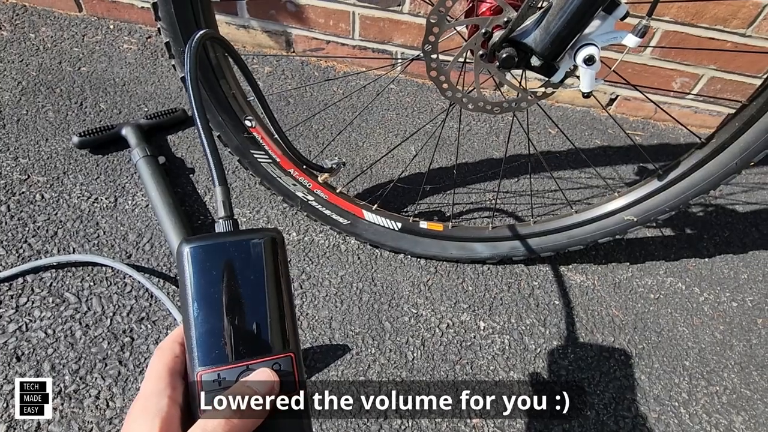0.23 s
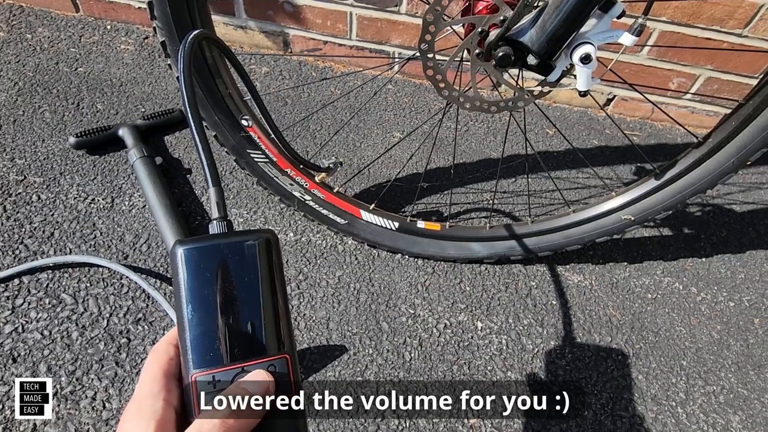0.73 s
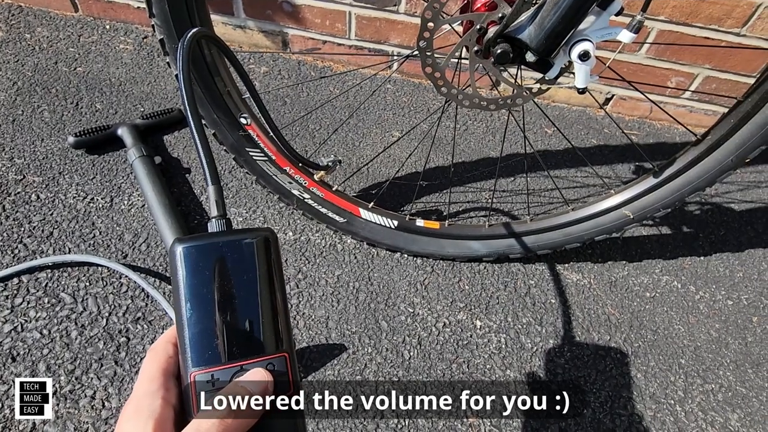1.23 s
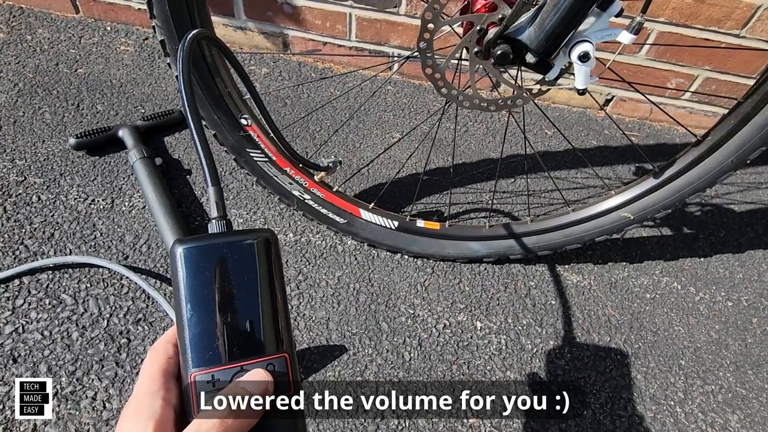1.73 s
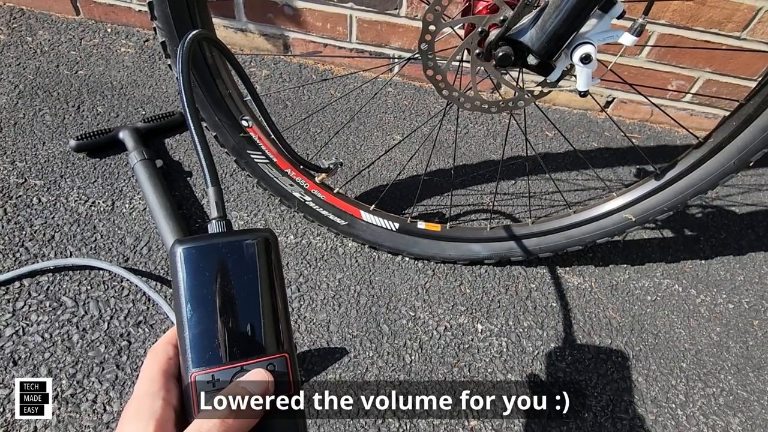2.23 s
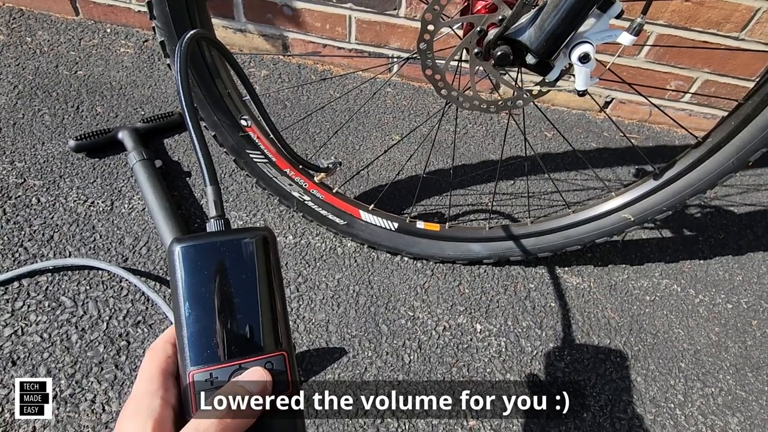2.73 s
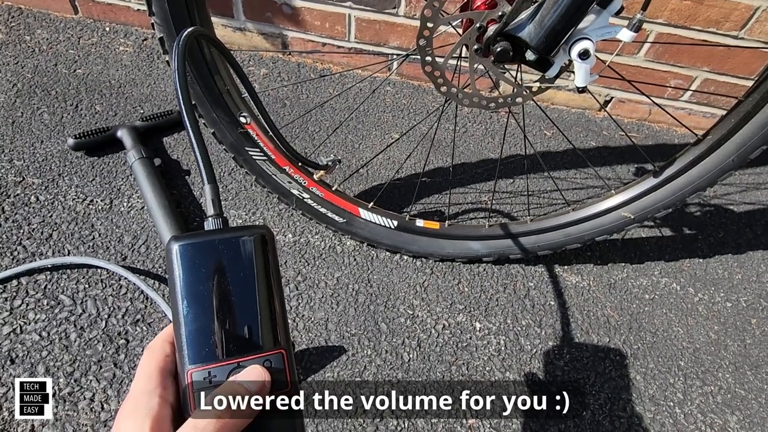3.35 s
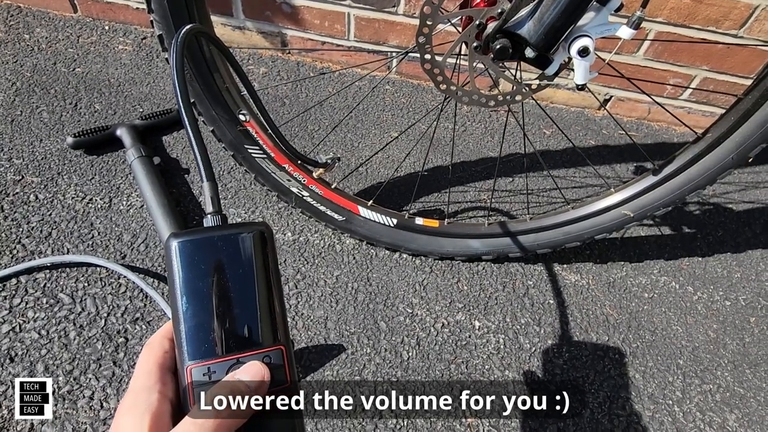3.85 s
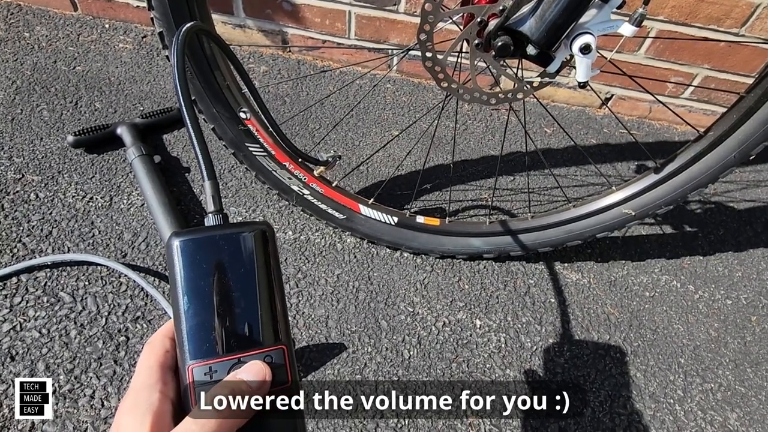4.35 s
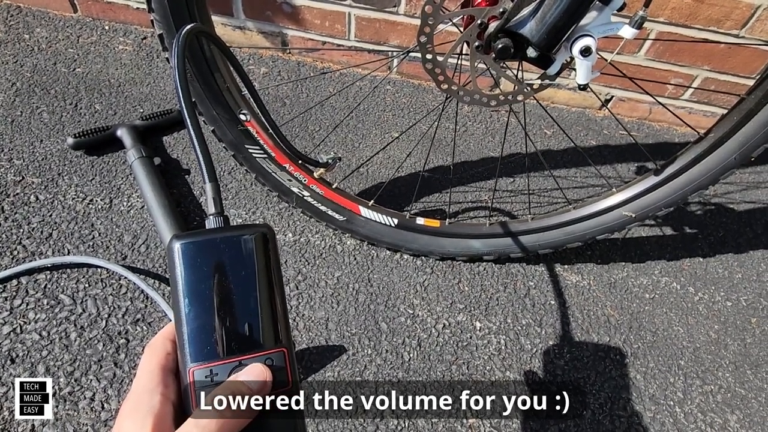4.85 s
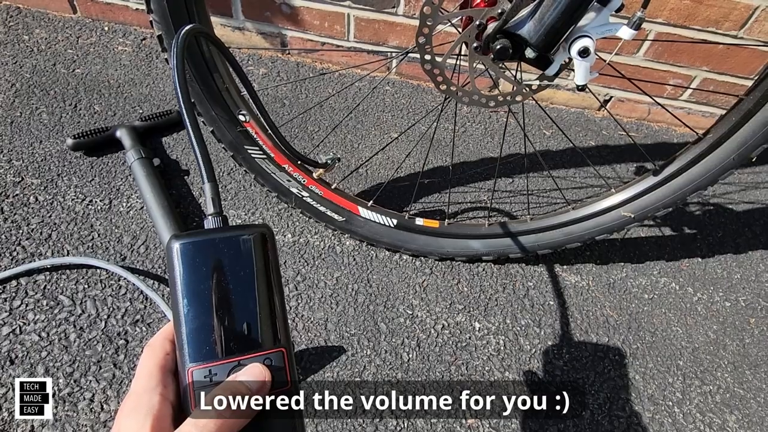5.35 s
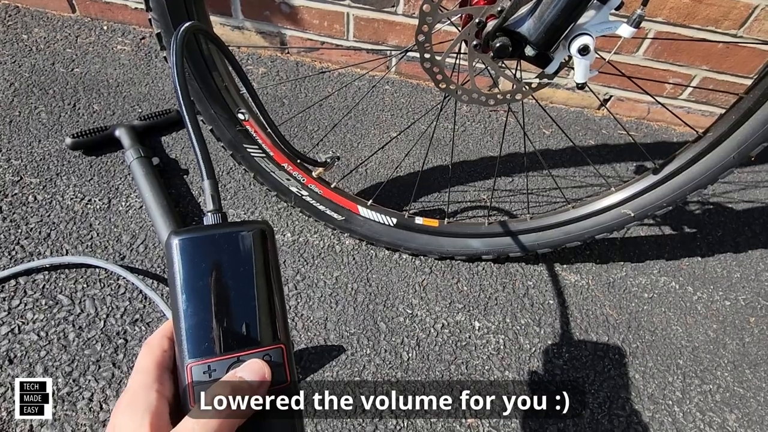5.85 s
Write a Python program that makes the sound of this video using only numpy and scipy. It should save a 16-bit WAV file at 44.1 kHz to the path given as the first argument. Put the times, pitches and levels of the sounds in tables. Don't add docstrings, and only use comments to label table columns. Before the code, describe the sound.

A small handheld air pump drones close by with fast throbbing, whining gears and rattling casing, slowing slightly while light wind buffets the microphone.

```python
import sys
import numpy as np
from scipy import signal
from scipy.fft import rfft, irfft, next_fast_len
from scipy.io import wavfile
from scipy.ndimage import uniform_filter1d, map_coordinates

SR = 44100
rng = np.random.default_rng(int(sys.argv[2]) if len(sys.argv) > 2 else 0)


def generate_wav(signal):
    frames = np.transpose(np.atleast_2d(signal))
    scaled = np.clip(frames, -1, 1) * 32767
    pcm = np.round(scaled).astype(np.int16)
    wavfile.write(sys.argv[1], SR, pcm)


def boost(x):
    u = np.asarray(x, float) / 20
    return 10 ** u


N = 268569


def unit(x):
    return x / np.sqrt(np.mean(x ** 2) + 1e-20)


def along(points, hz):
    f, *columns = np.transpose(points)
    return np.array([np.interp(np.log(hz + 1), np.log(f + 1), column) for column in columns])


def curves(rows):
    times, *columns = np.transpose(rows)
    return [np.interp(np.arange(N) / SR, times, column) for column in columns]


def wobble(rate):
    knots = rng.standard_normal(int(N * rate / SR) + 4)
    return map_coordinates(knots, [np.arange(N) * rate / SR])


def filtered(x, response):
    size = next_fast_len(N + 8192)
    hz = np.fft.rfftfreq(size, 1 / SR)
    return irfft(rfft(x, size) * response(hz), size)[..., :N]


# (time [s], frequency [Hz])
SPEED = [
    (0, 4361),
    (.6, 4349),
    (1.3, 4340),
    (2.2, 4312),
    (2.5, 4314),
    (4.2, 4266),
    (5.7, 4233),
    (6.09, 4229),
]
SPEED_ORDER = 73
FIRST_VALVE = .48


def crank_angle():
    steady = curves(SPEED)[0] / SPEED_ORDER
    hunting = .0009 * np.sin(2 * np.pi * np.cumsum(steady) / SR / 8) + .00035 * wobble(25)
    return np.cumsum(steady * (1 + hunting)) / SR + 1 - FIRST_VALVE


INTAKE_LEAD, INTAKE_ORDER = .28, 3.5
VALVE_ORDER = 24
CASING_ORDER, CASING_WIDTH = 14, .3


def thump_phase(order):
    intake_size = 2.8 * np.exp(-4 * np.log(order / INTAKE_ORDER) ** 2)
    intake = intake_size * np.exp(2j * np.pi * order * INTAKE_LEAD + .3j)
    valve = 1 / (1 - (order / VALVE_ORDER) ** 2 + .9j * order / VALVE_ORDER)
    ring = 1 / (1 + 1j * (order / CASING_ORDER - CASING_ORDER / order) / CASING_WIDTH)
    return np.angle(valve * (1 + 4 * ring ** 2) + intake)


TEETH = 37
MESH_LAG, MESH_GLIDE = .33, .26


def lines(turns, table, scatter, unsteady_db, lag=0):
    out = np.zeros((2, N), np.float32)
    run = np.arange(0, N + 64, 64) / N - .5
    for order, left_db, right_db, change_db, left_lead in table:
        knots = rng.standard_normal(60)
        unsteady = unsteady_db * map_coordinates(knots, [(run + .5) * 50])
        drift = unit(boost(change_db * run + unsteady))
        gain = np.outer(boost([left_db, right_db]), np.repeat(drift, 64)[:N])
        port_lead = np.c_[[0, left_lead]]
        side = order - TEETH * round(order / TEETH)
        if lag and order > TEETH / 2 and abs(side) < 4:
            start = -2 * np.pi * side * (MESH_LAG + MESH_GLIDE * side / 2) - port_lead
        else:
            crack_delay = 2 * np.pi * lag * (order - 6.5) * (order > 8)
            start = thump_phase(order) + scatter * knots[-1] - port_lead - crack_delay
        angle = order * turns % 1 * 2 * np.pi + start
        out -= np.sqrt(2) * gain * np.cos(angle.astype(np.float32))
    return out


# (multiple of turn rate, left level [dB], right level [dB], change over the run [dB], left lead [rad])
STROKE = [(1, -43, -43, 8, 0), (2, -40, -40, 0, .1), (3, -37, -41, -1, .1), (4, -34, -37, -2, .1),
          (5, -42, -42, 0, .2), (6, -40, -41, 0, .5), (7, -46, -49, -1, .5), (8, -39, -40, -5, .7),
          (9, -56, -52, -8, .8), (10, -45, -45, 5, .9), (11, -46, -42, 1, 1), (12, -56, -50, -10, 2.2)]
FLAP_LEAD = .065


def piston_stroke(turns):
    return lines(turns, STROKE, scatter=.05, unsteady_db=.7, lag=-FLAP_LEAD)


# (multiple of turn rate, left level [dB], right level [dB], change over the run [dB], left lead [rad])
KNOCK = [(13, -45, -41, -10, 2.3), (14, -42, -47, -5, 2.9), (15, -45, -67, 4, 1.6), (16, -44, -46, 2, 1.3),
         (17, -48, -46, 10, 1.3), (18, -63, -48, 7, 1.1), (19, -54, -50, 6, -3), (20, -50, -57, -10, 3),
         (21, -49, -54, -1, -2.8), (22, -49, -52, 10, -2.5), (23, -40, -48, 4, -2.3), (24, -47, -57, 3, .6),
         (25, -48, -55, -10, 2.4), (26, -48, -52, 2, -2.9), (27, -44, -48, 2, -2.1),
         (28, -49, -63, 5, -2.7), (29, -50, -55, 9, -2.9), (30, -50, -51, -3, -1.7)]
CRACK_LAG = .075


def valve_knock(turns):
    return boost(1.1) * lines(turns, KNOCK, scatter=.12, unsteady_db=.9, lag=CRACK_LAG)


# (multiple of turn rate, left level [dB], right level [dB], change over the run [dB], left lead [rad])
GEAR = [(31, -43, -51, -7, 2.2), (32, -41, -54, 0, 3.1), (33, -39, -50, 9, 3), (36, -47, -54, 5, -2.9),
        (37, -40, -45, 5, -2.3), (38, -41, -45, -5, 3), (39, -47, -47, -1, -3.1), (40, -51, -53, -3, 3)]
GEAR_OCTAVE = [(52, -49, -56, 8, .4), (58, -45, -59, -2, .2), (61, -47, -54, 8, 2.4),
               (62, -47, -53, 9, 2.8), (64, -48, -59, 1, -2.6), (65, -47, -56, 6, -2.2),
               (67, -44, -56, 10, .3), (68, -52, -50, -2, 1.5), (69, -51, -53, 4, 1),
               (70, -51, -53, 6, -.4), (71, -49, -46, -2, -2.1), (72, -46, -47, -2, -.4),
               (73, -40, -35, -1, 1.6), (74, -44, -43, -4, 2.4), (75, -45, -40, 2, -3),
               (76, -50, -55, 10, -2.4), (77, -52, -43, 2, -.6), (78, -59, -47, 0, -2.8)]


def gear_whine(turns):
    return lines(turns, [*GEAR, *GEAR_OCTAVE], scatter=.5, unsteady_db=1.1, lag=CRACK_LAG)


# (multiple of turn rate, left level [dB], right level [dB], change over the run [dB], left lead [rad])
GEAR_OVERTONES = [(109, -48, -52, -7, 2.4), (110, -55, -47, -10, .7), (111, -45, -49, 3, -.4),
                  (112, -49, -51, -10, -1), (113, -45, -44, -1, -.1), (116, -47, -54, 10, .7),
                  (125, -46, -52, 1, 2.6), (130, -49, -56, -3, .5), (141, -41, -45, -2, 1.6),
                  (143, -44, -48, 9, .8), (145, -47, -50, 10, -.3), (146, -37, -45, 8, .2),
                  (147, -45, -52, 6, 2.1), (148, -44, -52, 10, .4), (149, -46, -56, 4, 2.3),
                  (150, -46, -54, 8, 1.9), (182, -48, -60, 10, 1.6), (183, -48, -55, 10, 1.9),
                  (185, -51, -61, 8, .2), (186, -52, -59, -4, .4), (187, -51, -53, 0, .9),
                  (188, -53, -60, 6, -3.1), (220, -56, -48, 12, .5)]


def gear_overtones(turns):
    return boost(.5) * lines(turns, GEAR_OVERTONES, scatter=.7, unsteady_db=1.1)


# (multiple of motor rate, left level [dB], right level [dB], change over the run [dB], left lead [rad])
MOTOR = [(1, -55, -60, 0, .3), (3, -47, -52, -5, 3.1), (5, -46, -53, 2, -2.4), (7, -50, -61, 1, 2.5),
         (12, -48, -49, -8, -.4), (13, -55, -59, -4, 2.6), (18, -55, -58, -8, -2.1), (25, -51, -61, 3, -.1),
         (27, -52, -58, 0, 3)]
MOTOR_RATIO = 37 / 8


def motor_hum(turns):
    return boost(0.5) * lines(MOTOR_RATIO * turns, MOTOR, scatter=2.95, unsteady_db=-0.5)


def worn_teeth(turns, lasts, size=512):
    fresh = rng.standard_normal((int(turns.max()) + 4, size))
    pattern = uniform_filter1d(fresh, max(int(lasts), 1), axis=0)
    return unit(map_coordinates(pattern.ravel(), [turns * size + size], order=3))


# (frequency [Hz], level [dB])
REPEATS = [(1700, -30), (2300, -4), (2700, -2), (4500, -4), (5000, 0), (9000, -1), (15000, -1)]


def tooth_noise(turns):
    worn = worn_teeth(turns, lasts=50) + .5 * worn_teeth(MOTOR_RATIO * turns, lasts=90, size=112)
    return rng.standard_normal(N) + filtered(worn, lambda hz: boost(along(REPEATS, hz)[0]))


# (turns after the valve [turns], swell [dB], width [turns])
LOAD = [
    (.03, 4, 0.039),
    (.1, 2.5, 0.014),
    (.27, 8, 0.016),
    (.85, 6.5, 0.052),
]


def piston_load(turns):
    load_db = 0
    for at, db, width in LOAD:
        distance = (turns - at + .5) % 1 - .5
        load_db = load_db + db * np.exp(-.5 * (distance / width) ** 2)
    return load_db


# (time [s], level [dB], left-right, heard about its mean [dB])
RATTLE = [
    (0, -39, -6.5),
    (.4, -37.5, -6),
    (1.3, -38, -5.5),
    (4.4, -38.5, -4.5),
    (6.09, -38.5, -6.5),
]
# (frequency [Hz], left level [dB], right level [dB])
CASING = [(210.0, -8.0, -2.0), (360.0, -11.0, -8.0), (570.0, -11.0, -7.0), (770.0, -5.0, -2.0),
          (900.0, -4.0, -7.0), (1070.0, -9.0, -7.0), (1380.0, -2.0, -8.0), (1550.0, -5.0, -6.0),
          (1890.0, 0.0, -8.0), (2050.0, -8.0, -12.0), (2230.0, -7.0, -8.0), (2600.0, -13.0, -12.0)]
MESH = [(2610.0, -13.0, -13.0), (3160.0, -7.0, -9.0), (3300.0, -1.0, -7.0), (3480.0, -7.0, -7.0),
        (3800.0, -3.0, -9.0), (3980.0, -7.0, -7.0), (4550.0, -9.0, -3.0), (5040.0, -14.0, -14.0),
        (5860.0, -12.0, -14.0), (6380.0, -5.0, -10.0), (6660.0, -8.0, -7.0), (6820.0, -3.0, -8.0),
        (7160.0, -9.0, -9.0), (8000.0, -7.0, -13.0)]
HISS = [(8000.0, -7.0, -12.0), (8280.0, -2.0, -5.0), (8590.0, -1.0, -7.0), (9220.0, -12.0, -23.0),
        (9670.0, -15.0, -25.0), (10200.0, -14.0, -23.0), (10760.0, -6.0, -12.0), (12040.0, -17.0, -14.0),
        (12940.0, -12.0, -9.0), (13430.0, -14.0, -15.0), (14820.0, -9.0, -14.0), (15590.0, -13.0, -16.0)]
# (frequency [Hz], left level [dB], right level [dB])
HOLLOW = [(2360, -11, -11), (2460, -19, -19), (2560, -14, -13), (2720, -9, -10)]
# (frequency [Hz], likeness [0-1])
ALIKE = [(400, 0.28), (2300, 0.48), (2500, 0.35), (2900, 0.24), (4000, 0.048), (6500, 0.04), (9000, 0.36),
         (12500, 0.41)]
# (frequency [Hz], lead [rad])
LEAD = [(0, -3), (1380, 4.5), (2340, 4.5), (2530, 2.5), (2600, 0.5), (2800, -1.8), (3360, 1.2),
        (4390, 11.5), (5940, 12.5), (6630, 19.5), (7320, 21), (8530, 22), (10600, 26), (11900, 31),
        (12700, 24), (15300, 37)]
BAND_EDGES = [2600, 9700]
FOLLOWS = [2.1, .75, -.8]
BAND_DB = [0.5, -0.47, -0.4]


def rattle(turns):
    sources = np.array([tooth_noise(turns), tooth_noise(turns)])
    load_db = piston_load(turns)
    spectrum = sorted([(60, -40, -40), *CASING, *HOLLOW, *MESH, *HISS])

    def ports(hz):
        lead = np.outer([.5, -.5], np.interp(hz, *np.transpose(LEAD)))
        return boost(along(spectrum, hz)) * np.exp(1j * lead)

    sound = 0
    for band, follows in enumerate(FOLLOWS):
        def inside(hz):
            spread = np.arccos(np.clip(along(ALIKE, hz)[0], 0, 1)) / 2
            return (np.digitize(hz, BAND_EDGES) == band) * [np.cos(spread), np.sin(spread)]

        common, apart = filtered(sources * unit(boost(follows * load_db)), inside)
        sound = sound + boost(BAND_DB[band]) * np.array([common + apart, common - apart])
    level_db, pan_db = curves(RATTLE)
    gain = boost(level_db + 18.5 + np.outer([.5, -.5], pan_db - pan_db.mean()))
    return gain * filtered(sound, ports)


def pump():
    turns = crank_angle()
    tones = piston_stroke(turns) + valve_knock(turns) + gear_whine(turns)
    tones = tones + gear_overtones(turns) + motor_hum(turns)
    return tones + rattle(turns)


# (time [s], level [dB])
BREEZE = [(0, -43), (1.2, -49), (1.9, -46), (2.2, -37.5), (2.85, -39), (3.0, -41), (4.0, -45), (4.3, -49),
          (5.1, -44), (5.3, -51), (5.4, -42), (6.09, -51)]
# (time [s], level [dB], half length [s], left-right [dB])
GUSTS = [(.3, -50, 0.04, 3), (0.44, -47, .04, -8), (.58, -45, 0.027, 2), (1.953, -44, 0.012, 4),
         (2.17, -40, 0.044, 0), (2.33, -38, 0.031, -15), (2.397, -41, 0.021, 5), (2.524, -42, .03, -9),
         (2.657, -37, 0.038, 7), (2.82, -31, 0.022, -13), (2.87, -39, 0.032, -10), (3.07, -41, .02, 2),
         (3.23, -42, .03, 6), (3.382, -40, 0.049, 6), (3.788, -45, 0.045, 12), (3.917, -37, .03, 6),
         (4.02, -39, 0.033, 10), (4.73, -47, 0.038, -7), (5.206, -44, .012, -8), (5.35, -35, 0.032, -16),
         (5.45, -35, .03, -10), (5.582, -32, 0.055, -9), (5.719, -27.5, 0.027, -10), (5.84, -42, 0.04, 16),
         (5.954, -28, 0.019, -5), (6.07, -34, 0.049, 0)]
# (frequency [Hz], level [dB])
BUFFET = [(15, -34), (30, -3), (50, 1.5), (90, 3), (150, -4.5), (250, -15), (450, -18), (800, -71)]


def breeze():
    t, sides = np.arange(N) / SR, np.c_[[.5, -.5]]
    breeze_db = curves(BREEZE)[0] + 2.5 * wobble(12)
    power = boost(breeze_db + sides * (3 * wobble(10) - 1)) ** 2
    for at, db, half, pan_db in GUSTS:
        power = power + boost(db + sides * pan_db) ** 2 * np.exp(-((t - at) / half) ** 2)
    noise = rng.standard_normal(N) + .38 * rng.standard_normal((2, N))
    lumps = np.sqrt(power) * boost(0.5 + 2.3 * wobble(30))
    air = filtered(noise, lambda hz: boost(along(BUFFET, hz)))
    evenness = np.sqrt(np.abs(uniform_filter1d(air ** 2, size=2000)) + 1e-9)
    return lumps * air / evenness


def scene():
    return pump() + breeze()


def low_pass(x):
    return signal.sosfilt(signal.butter(12, 15950, fs=SR, output="sos"), x)


def record(dry):
    return low_pass(dry)


dry = scene()
out = record(dry)
generate_wav(out)
```